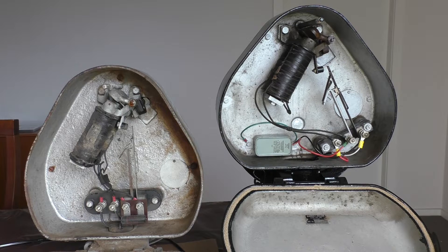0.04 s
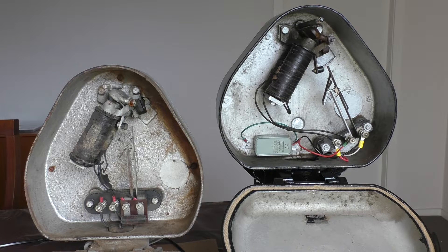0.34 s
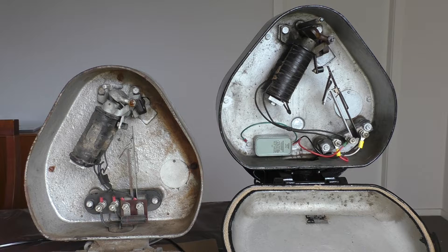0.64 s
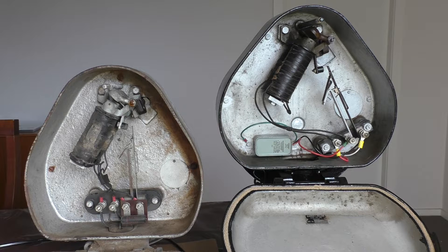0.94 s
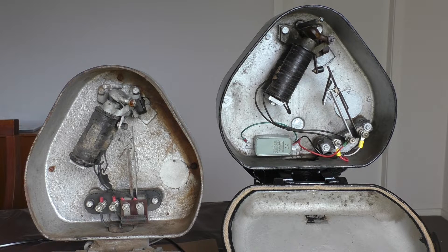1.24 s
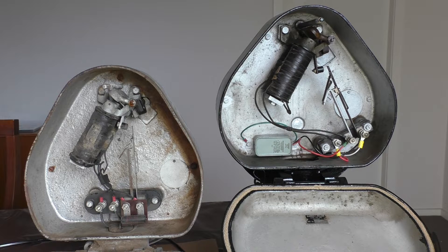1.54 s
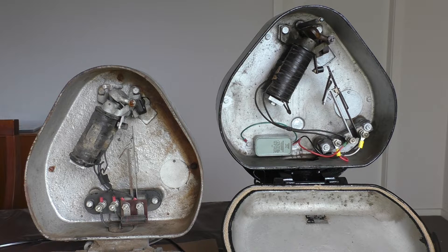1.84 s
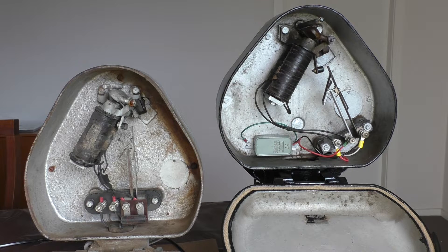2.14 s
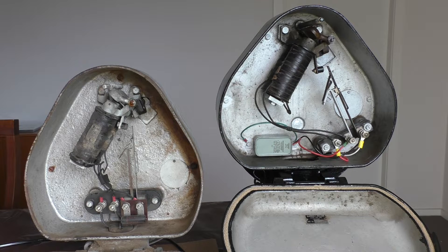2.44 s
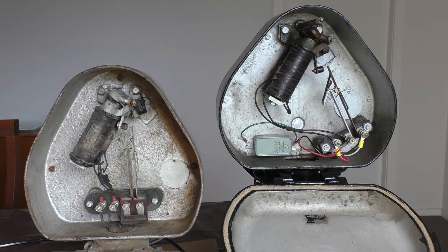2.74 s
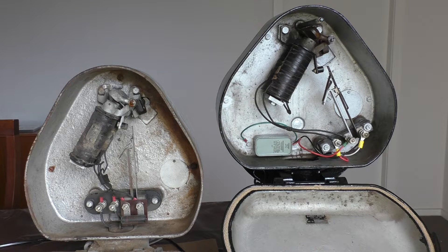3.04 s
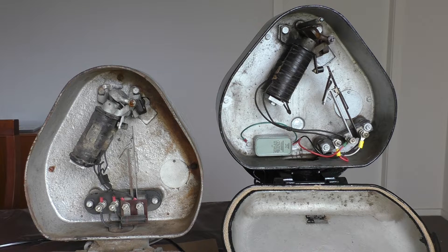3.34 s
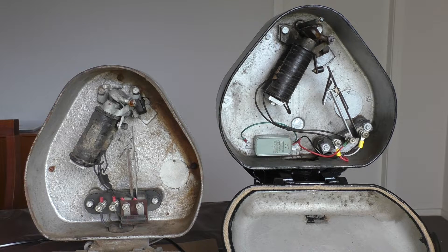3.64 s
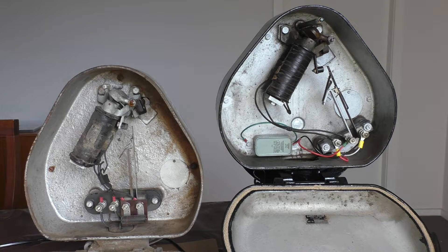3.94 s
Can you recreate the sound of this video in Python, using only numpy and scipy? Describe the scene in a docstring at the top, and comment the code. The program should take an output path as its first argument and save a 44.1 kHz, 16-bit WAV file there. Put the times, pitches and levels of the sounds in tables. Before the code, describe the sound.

The sustained low ring of a metal bell slowly dies away in a quiet room, with no new strike. A few very faint chirps sound at the beginning, and light hiss and rumble continue underneath.

```python
"""Railway crossing bell ringing out

A large iron bell decays in a quiet room, some seconds after its last blow. Four pure partials
remain; the higher die sooner, and the lower three beat slowly as the casting is not quite round.
Behind it: a few faint chirps, probably a bird outside, room rumble and microphone hiss."""
import sys
import numpy as np
from scipy import signal
from scipy.fft import rfft, irfft
from scipy.io import wavfile
from scipy.ndimage import uniform_filter1d

SR = 44100
rng = np.random.default_rng(int(sys.argv[2]) if len(sys.argv) > 2 else 0)


def wav_record(signal):
    """Record a signal, one row per channel, as 16-bit PCM in the file named by sys.argv[1]."""
    frames = np.transpose(np.atleast_2d(signal))
    bounded = np.clip(frames, -1, 1)
    # unit amplitude maps onto the largest positive 16-bit level
    quanta = np.round(bounded * 32767).astype(np.int16)
    wavfile.write(sys.argv[1], SR, quanta)


N = 176400


def undb(db):
    """Decibels to gain."""
    return 10 ** (np.asarray(db) / 20)


def pan(db):
    """Stereo gains for a left-minus-right level."""
    return undb(np.array([[db], [-db]]) / 2)


def bell(t):
    """Freely decaying partials; a weaker twin mode drifts in and out of phase with its partner."""
    # (frequency [Hz], level [dB], T60 [s], left minus right [dB], left lead [ms])
    partials = [ (226.93, -31, 64.6, -0.26, 0.29), (606, -28.5, 21.5, -2.5, -0.098),
                (1076.64, -41.5, 15.4, 1.4, 0.063), (1604, -53, 8.7, 3, -0.19), ]
    # twin modes, levels relative to the partner:
    # (partner [Hz], split [Hz], level [dB], left minus right [dB], beat trough [s])
    twins = [ (227, .13, -28.5, -14.5, 5.1), (606, 0.26, -14, .5, .26), (1077, 0.6, -11, 7, 1.5), ]
    out = 0
    for hz, level_db, t60_s, pan_db, lead_ms in partials:
        shift_s = np.array([[lead_ms], [-lead_ms]]) / 2000
        cycles = hz * (t + shift_s) + rng.random()
        ring = np.exp(2j * np.pi * cycles - np.log(1000) * t / t60_s)
        for partner_hz, split_hz, twin_db, twin_pan_db, trough_s in twins:
            if abs(np.log2(partner_hz / hz)) < .25:  # this partial's twin
                beat = np.exp(2j * np.pi * split_hz * (t - trough_s))
                ring = ring * (1 - undb(twin_db) * pan(twin_pan_db) * beat)
        out = out + np.sqrt(2) * undb(level_db) * pan(pan_db) * ring.real
    return out


def wander(rate_hz):
    """Smooth random motion, unit standard deviation."""
    width = max(int(SR / rate_hz), 1)
    motion = uniform_filter1d(uniform_filter1d(rng.standard_normal(N), width), width)
    return motion / motion.std()


def room_echo(x, t, t60_s=0.51):
    """Diffuse unit-energy tail, independent per channel."""
    tail = rng.standard_normal((2, N)) * np.exp(-np.log(1000) * t / t60_s)
    tail /= np.sqrt(np.sum(tail ** 2, axis=1, keepdims=True))
    return signal.fftconvolve(x[None], tail, axes=1)[:, :N]


def bird(t):
    """Short, slightly falling whistles, raspy from fast pitch wobble, blurred by the room."""
    # (start [s], length [s], pitch [Hz], level [dB])
    chirps = [(-.01, .06, 3890, -66.5), (0.156, 0.033, 3900, -70), (0.18, 0.053, 3790, -66.5),
              (.232, .055, 3880, -70.5), (0.461, .08, 3850, -69.5)]
    fall_hz, echo_db = 70, 2
    wobble_hz = 100 * wander(rate_hz=500)
    song = 0
    for start_s, length_s, pitch_hz, level_db in chirps:
        progress = np.clip((t - start_s) / length_s, 0, 1)
        hz = pitch_hz - fall_hz * (progress - .5) + wobble_hz
        envelope = undb(level_db) * np.sqrt(2) * np.sin(np.pi * progress)
        song = song + envelope * np.sin(2 * np.pi * np.cumsum(hz) / SR)
    return song + undb(echo_db) * room_echo(song, t)


def noise(spectrum):
    """Noise shaped to (frequency [Hz], density [dB/Hz]) points."""
    hz, db = np.array(spectrum).T
    bin_hz = np.maximum(np.arange(N // 2 + 1) * SR / N, 1)
    gain = undb(np.interp(np.log(bin_hz), np.log(hz), db))
    return irfft(rfft(rng.standard_normal(N)) * gain, N) * np.sqrt(SR / 2)


def rumble_and_hiss():
    """Steady room rumble plus microphone self-noise, mixed as mid and side."""
    # noise spectra: (frequency [Hz], density [dB/Hz])
    room_mid = [(15, -90), (32, -85.5), (62, -79), (90, -80), (140, -80.5), (280, -81.5), (520, -85),
                (750, -90.5), (1400, -94.5), (3000, -103), (6000, -115), (15000, -135)]
    room_side = [(15, -86.5), (50, -83), (150, -84), (500, -87), (750, -93.5), (1400, -95.5), (3000, -104),
                 (4800, -110), (6500, -124), (15000, -140)]
    hiss = [(3000, -122), (6500, -116), (9000, -110.5), (12500, -108), (15500, -109)]
    hiss_side_db = -6
    mid = noise(room_mid) + noise(hiss)
    side = noise(room_side) + undb(hiss_side_db) * noise(hiss)
    return np.array([mid + side, mid - side])


def scene():
    """Bell, bird and noise floor, in stereo."""
    t = np.arange(N) / SR
    return bell(t) + bird(t) + rumble_and_hiss()


def record(dry):
    """Steep zero-phase low-pass."""
    cutoff_hz = 15660
    lowpass = signal.ellip(12, .02, 60, cutoff_hz, fs=SR, output="sos")
    return signal.sosfiltfilt(lowpass, dry, padlen=4096)


dry = scene()
out = record(dry)
wav_record(out)
```